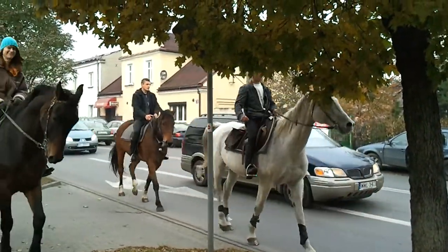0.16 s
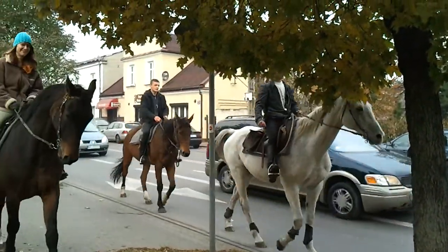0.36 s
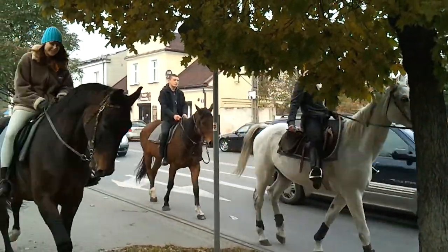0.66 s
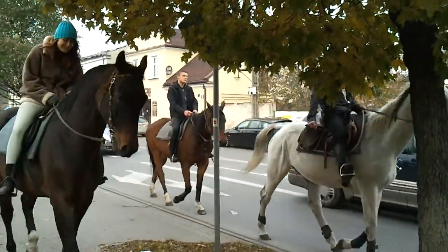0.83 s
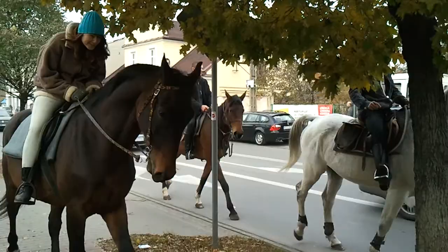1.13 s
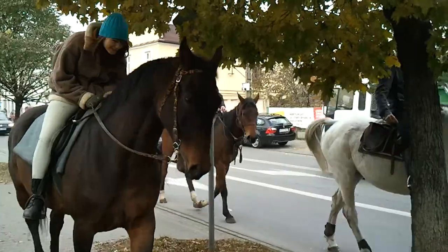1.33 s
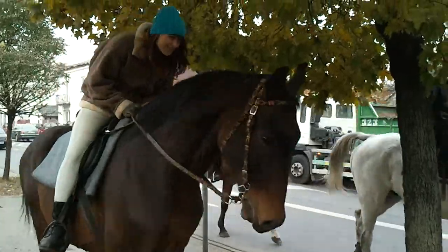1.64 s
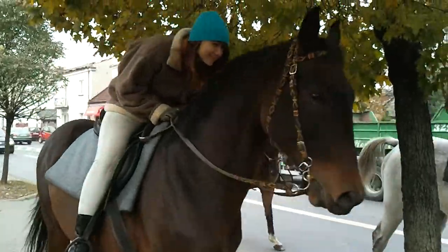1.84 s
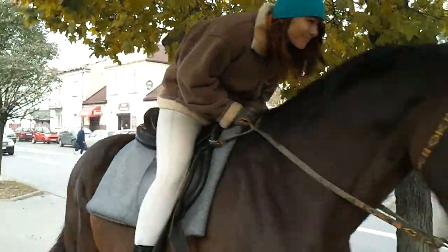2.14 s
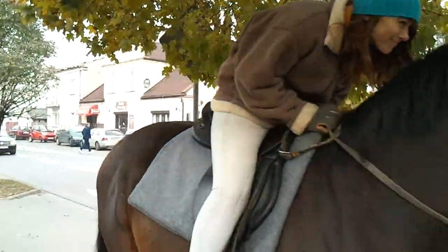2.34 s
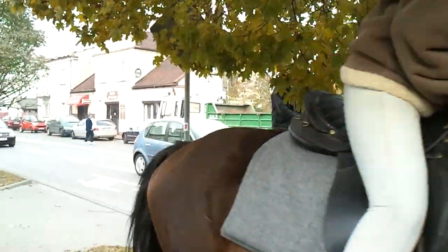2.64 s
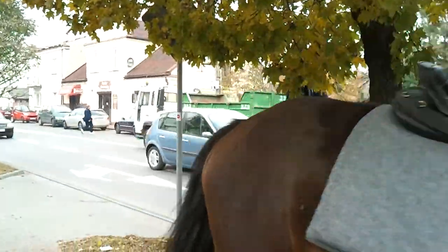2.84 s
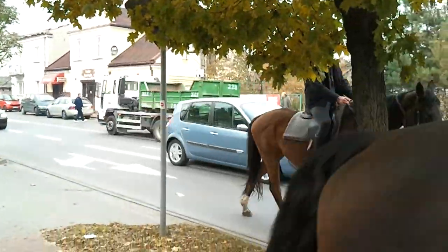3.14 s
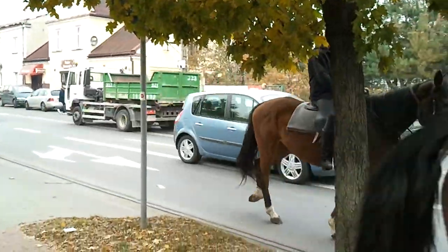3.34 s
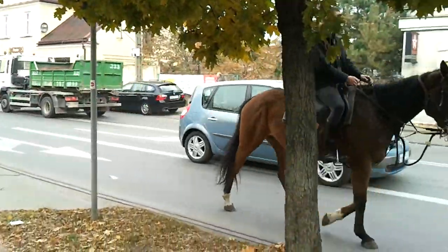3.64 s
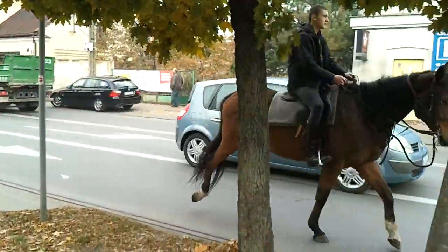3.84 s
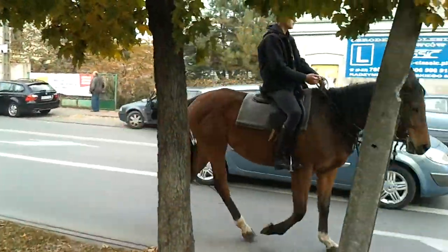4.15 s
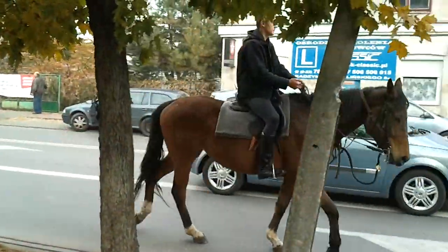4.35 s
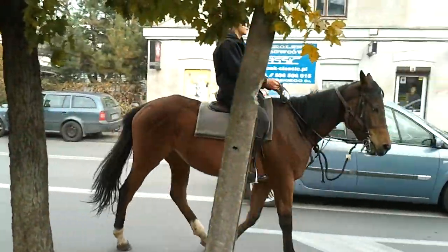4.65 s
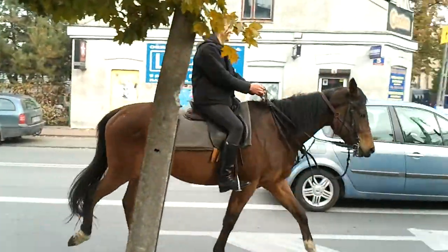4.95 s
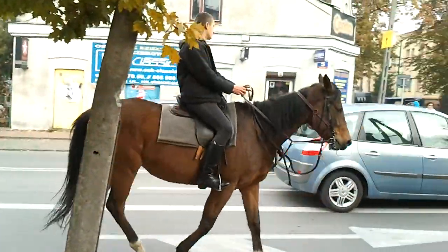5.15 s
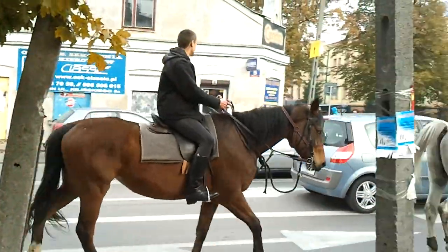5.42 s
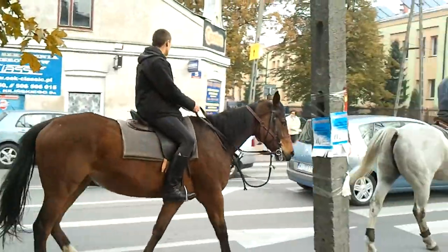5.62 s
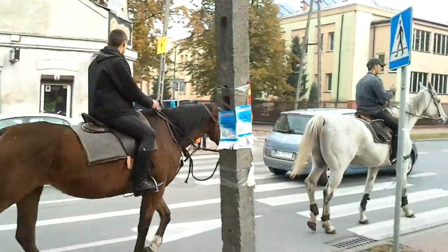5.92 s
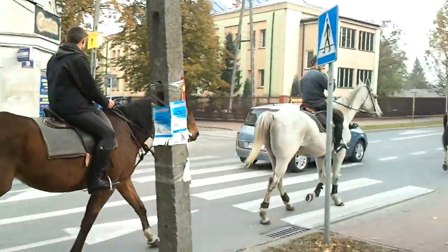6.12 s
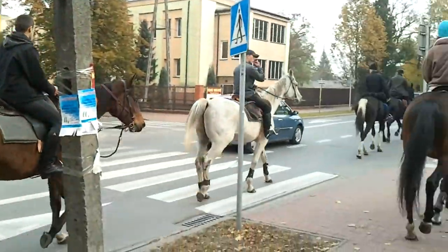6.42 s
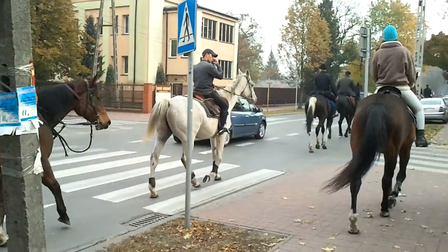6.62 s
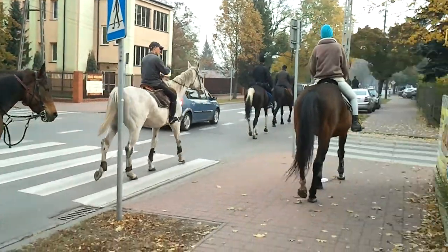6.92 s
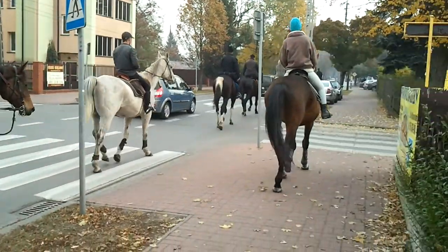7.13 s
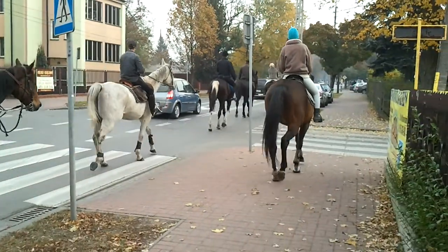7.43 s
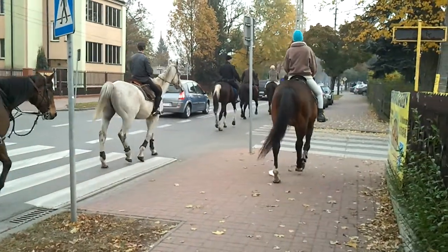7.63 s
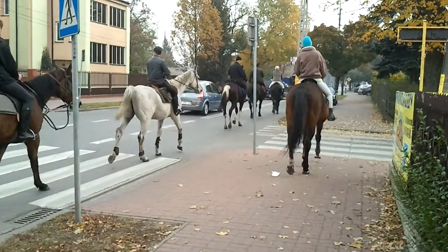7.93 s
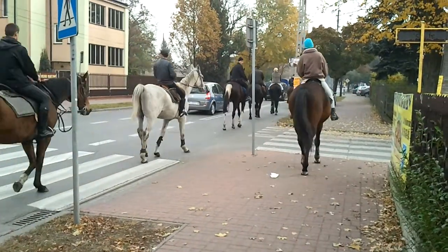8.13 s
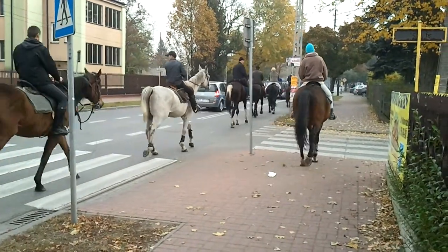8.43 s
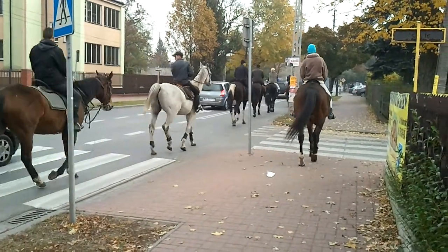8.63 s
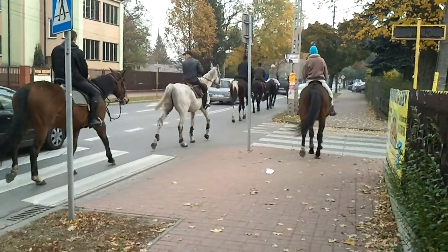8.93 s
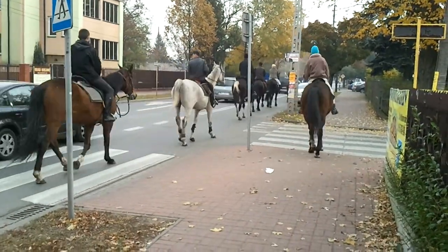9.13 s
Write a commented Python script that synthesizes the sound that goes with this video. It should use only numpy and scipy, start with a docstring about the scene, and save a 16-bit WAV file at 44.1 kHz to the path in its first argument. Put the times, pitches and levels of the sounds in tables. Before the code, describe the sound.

Several horses walk along a paved town street, close to the microphone from the start. Their hooves land in an uneven, overlapping clip-clop, each step a hollow knock with a little grit, sometimes a faint iron clink or scrape, and a slight echo from the house fronts. The clops are densest through the first 4 seconds, with strong single steps up to about 5 seconds. After that they become sparser and softer as the horses move away, continuing to the end at about 9 seconds.

Slow traffic rumbles low throughout. A lorry hums faintly during the first 3 seconds. From around 3 seconds a nearby car pulls away, its low engine note rising gradually. Tyre noise swells gently as vehicles roll by at about 1 second, most clearly near 4.5 seconds, and again around 6 and 7.5 seconds.

```python
"""Horses beside slow traffic.

Several horses walk past and away on a paved street. Each hoof knocks, rings hollow and crunches grit;
iron shoes clink and skid, and house fronts throw the clops back. Engines drone low, one pulling away
with rising pitch; tyre noise swells as each vehicle rolls by. A gain control ducks the loud moments."""
import sys
import numpy as np
from scipy import signal
from scipy.fft import rfft, irfft, next_fast_len
from scipy.io import wavfile
from scipy.ndimage import uniform_filter1d

SR = 44100
rng = np.random.default_rng(int(sys.argv[2]) if len(sys.argv) > 2 else 0)


def to_wav(sig):
    """Store sig (one row per channel, or 1-D mono) as 16-bit WAV at the path in sys.argv[1].

    Samples outside -1..1 are clipped; the rate is SR.
    """
    pcm = np.clip(np.atleast_2d(sig), -1, 1) * 32767
    pcm = np.round(pcm).astype(np.int16)
    wavfile.write(sys.argv[1], SR, pcm.T)  # frames by channels


N = 408807

# Steps of the nearest horses. Each row: start in seconds, knock in relative dB, knock in Hz,
# hollow ring in relative dB, ring in Hz, free ring t60 in seconds, crack in relative dB, crack in Hz.
HOOF_STEPS = [(0.0403, -27, 570.0, -21, 880, 0.021, -44, 1730.0),
              (0.056, -40, 900, -31, 870, 0.025, -40, 1500), (0.068, -36, 800, -31, 780, 0.025, -36, 1500),
              (0.0967, -27, 380.0, -23, 980, 0.045, -36, 1920.0),
              (0.121, -19, 940.0, -21, 720, 0.05, -22.5, 2530.0),
              (0.1322, -39, 550.0, -21.5, 710, 0.027, -30, 1050.0),
              (0.3605, -29, 730.0, -24, 1020, 0.075, -27, 1120.0),
              (0.3916, -14.5, 510.0, -12, 933, 0.038, -30, 1880),
              (0.4034, -21, 920.0, -24, 896, 0.025, -22, 1650.0),
              (0.433, -26, 520.0, -20, 835, 0.017, -45, 1300.0),
              (0.596, -22, 990.0, -31, 553, 0.05, -25.5, 2040.0),
              (0.624, -19, 770.0, -23, 969, 0.058, -38, 1450.0),
              (0.6372, -15.5, 870.0, -32, 1045, 0.05, -20, 1870.0),
              (0.82, -29, 980.0, -30.5, 1090, 0.05, -41, 2220.0),
              (0.898, -38, 1000, -34, 1110, 0.03, -36, 1700),
              (0.9125, -23, 1250.0, -13.5, 876, 0.036, -37, 2200.0),
              (0.9196, -27, 800, -27, 760, 0.018, -39, 2000), (1.097, -34, 900, -26, 1040, 0.03, -38, 1700),
              (1.1549, -18.5, 830.0, -28, 985, 0.034, -32, 2560.0),
              (1.224, -35, 892, -27, 890, 0.03, -40, 1400),
              (1.3335, -22.5, 1290.0, -25.5, 1225, 0.062, -30, 2470.0),
              (1.409, -37, 900, -21.5, 910, 0.025, -34, 1600),
              (1.4336, -27, 1500.0, -15, 760, 0.025, -30, 1950.0),
              (1.483, -36, 380.0, -15.5, 928, 0.04, -36, 1850.0),
              (1.623, -40, 1098, -28, 1090, 0.023, -38, 1500),
              (1.6664, -35, 1100, -22, 1030, 0.025, -39, 2300),
              (1.6733, -15.5, 730.0, -21, 950, 0.05, -24, 1790.0),
              (1.704, -37, 900, -27, 850, 0.03, -37, 1700), (1.73, -32, 1502, -24, 774, 0.018, -42, 2400.0),
              (1.842, -35, 1090.0, -34, 1240, 0.05, -25, 1440),
              (1.888, -33, 805, -32, 1058, 0.045, -33, 1140.0),
              (1.939, -36, 1290, -24, 900, 0.02, -36, 1560),
              (1.9493, -25, 640.0, -16.5, 718, 0.05, -47, 2310.0),
              (2.0067, -24, 1515, -16, 930, 0.056, -31, 1980.0),
              (2.124, -21, 380.0, -28, 1080, 0.058, -24, 1180.0),
              (2.1909, -12.5, 760, -19.5, 690, 0.053, -23, 1560.0),
              (2.2364, -36, 930.0, -22.5, 1040, 0.05, -31, 1960.0),
              (2.247, -22.5, 810.0, -21, 950, 0.027, -34.5, 1870.0),
              (2.281, -40, 850.0, -30, 915, 0.028, -31, 1130.0),
              (2.3108, -29, 510.0, -24.5, 784, 0.05, -31, 1250.0),
              (2.3342, -29, 1210, -32, 950, 0.018, -29, 1480),
              (2.3893, -30, 703, -24, 884, 0.046, -36, 1650.0),
              (2.4607, -11.5, 730.0, -30, 708, 0.05, -36, 1720.0),
              (2.468, -26, 650, -26, 700, 0.02, -38, 1700),
              (2.4927, -28, 610.0, -19.5, 663, 0.048, -32, 1160.0),
              (2.5103, -31, 691, -16, 916, 0.052, -33, 1620.0),
              (2.586, -26, 640.0, -22, 923, 0.01, -38, 2080.0),
              (2.612, -21, 1040.0, -9.5, 430, 0.02, -15.5, 1400.0),
              (2.7012, -29, 800.0, -18.5, 760, 0.075, -19.5, 1660),
              (2.7521, -22.5, 1050.0, -32, 871, 0.049, -36, 1580),
              (2.797, -34, 917, -28, 1020, 0.023, -41, 1700),
              (2.8208, -44, 1500.0, -23, 1400, 0.015, -37, 2490.0),
              (2.8323, -38, 1360.0, -11, 420, 0.014, -22, 1130.0),
              (2.9565, -18.5, 667.4, -27.5, 705, 0.045, -31, 1960),
              (3.023, -38, 1500.0, -19, 930, 0.054, -21.5, 1050.0),
              (3.1, -38, 796, -27.5, 820, 0.03, -38, 1700),
              (3.2107, -19, 860, -27.5, 766, 0.047, -37, 2600),
              (3.279, -35, 800, -26, 864, 0.03, -44, 1700),
              (3.3189, -35, 558, -16.5, 1400, 0.013, -29, 1920),
              (3.416, -36, 900, -25, 1100, 0.03, -42, 1700),
              (3.444, -32, 380.0, -15, 739, 0.025, -30, 1970.0),
              (3.5435, -34, 620.0, -17.5, 950, 0.019, -20, 1140.0),
              (3.599, -19.5, 560.0, -14, 930, 0.02, -37, 2000),
              (3.7065, -38, 900, -17, 855, 0.013, -39, 1880.0),
              (3.8174, -10, 650.0, -15.5, 1025, 0.025, -17, 1600),
              (3.926, -41, 550.0, -17.5, 774, 0.03, -31, 2300.0),
              (4.0684, -24, 950.0, -27, 1056, 0.014, -31, 1900),
              (4.1013, -18, 587, -14, 910, 0.038, -46, 2170.0),
              (4.3314, -18, 690.0, -37, 863, 0.05, -18, 1240.0),
              (4.42, -42, 640.0, -20, 718, 0.011, -29, 2040.0),
              (4.5738, -46, 710.0, -21, 950, 0.033, -44, 1960.0),
              (4.6348, -18, 780, -33, 830, 0.02, -32, 1795),
              (4.716, -40, 810.0, -15.5, 940, 0.013, -45, 1930.0),
              (4.844, -19, 1500.0, -8, 758, 0.012, -17, 1110.0),
              (4.935, -20, 609, -22, 696, 0.066, -40, 2450.0),
              (5.107, -33, 948, -26.5, 990, 0.025, -47, 1700),
              (5.1295, -34, 900, -28, 950, 0.027, -40, 1700),
              (5.1364, -14, 824, -26, 968, 0.04, -44, 2210.0),
              (5.241, -33, 900, -27, 714, 0.025, -40, 1600), (5.313, -36, 1200, -35, 950, 0.021, -26, 1400),
              (5.3835, -25, 960.0, -29, 544.3, 0.058, -28.5, 2000),
              (5.4696, -35, 520.0, -19, 650, 0.069, -44, 1050.0),
              (5.5957, -40, 429.7, -13.5, 903, 0.012, -29, 1890.0),
              (5.771, -31, 730.0, -25, 1033, 0.05, -39, 1690.0),
              (5.886, -34, 700, -25, 694, 0.025, -37, 1593), (6.016, -30, 1210, -32, 950, 0.022, -25, 1330),
              (6.0973, -30, 1500.0, -25.5, 966, 0.05, -40, 2690),
              (6.1738, -23.5, 670, -38, 700, 0.037, -21, 1330),
              (6.419, -36, 700, -28, 666, 0.03, -42, 1600),
              (6.633, -26, 380.0, -22.5, 940, 0.036, -48, 1505),
              (6.7013, -31, 450.0, -17.5, 1060, 0.029, -35, 1800.0),
              (6.708, -24, 600, -33, 910, 0.04, -30, 1810),
              (6.9316, -36, 1270.0, -20, 1049, 0.022, -32, 2670.0),
              (7.1495, -38, 750.0, -27, 1010, 0.037, -34, 2460),
              (7.234, -26, 1200, -34, 950, 0.02, -28, 1510),
              (7.3755, -35, 380.0, -24.5, 721, 0.057, -32, 1350),
              (7.555, -24, 1500.0, -27, 881, 0.012, -29, 1250.0),
              (7.566, -35, 900, -29, 990, 0.032, -40, 1600),
              (7.779, -27, 590.0, -18.5, 769, 0.018, -20, 1140.0),
              (7.8331, -33, 1500.0, -27, 730, 0.05, -35, 2080.0),
              (8.1377, -35, 440.0, -27, 930, 0.043, -39, 2600.0),
              (8.243, -35, 1200, -34, 950, 0.02, -24, 1450), (8.301, -32, 1010, -24, 1020, 0.02, -37, 1503),
              (8.319, -34, 610.0, -19.5, 796, 0.023, -27, 1760.0),
              (8.412, -36, 1200, -33, 950, 0.02, -28, 1430),
              (8.551, -34, 760.0, -26, 979, 0.012, -34, 2230.0),
              (8.604, -35, 910, -26, 1080, 0.015, -34, 1500),
              (8.8023, -37, 1510, -34, 940, 0.05, -26, 1040), (8.818, -39, 800, -30, 840, 0.03, -44, 1600),
              (8.8828, -36, 380.0, -31, 784, 0.04, -33.5, 2260.0),
              (8.91, -38, 800, -29.5, 875, 0.025, -40, 1600), (9.136, -40, 1200, -41, 953, 0.02, -30, 1480),
              (9.2191, -33, 800, -29, 895, 0.039, -46, 1510.0)]
# Low road roar. Each row: frequency in Hz, density in relative dB.
ROAR_SPECTRUM = [(200, -10), (300, 2), (420, 2), (530, -1), (680, -5.5), (950, -21), (1400, -37.5)]


def from_db(db):
    """Decibels to gain."""
    return 10 ** (np.asarray(db) / 20)


def unit_rms(x):
    """Scale to unit power."""
    return x / np.sqrt(np.mean(x ** 2) + 1e-20)


def curves(rows):
    """Interpolate each column per sample; the first column is time in seconds."""
    times_s, *columns = np.transpose(rows)
    return [np.interp(np.arange(N) / SR, times_s, column) for column in columns]


def add(track, start_s, sound):
    """Mix a short sound into a track."""
    start = int(np.clip(round(start_s * SR), 0, N - 1))
    track[start:start + len(sound)] += sound[:N - start]


def drift(rate_hz):
    """Slow random curve, unit RMS."""
    knots = rng.standard_normal(4096)
    return unit_rms(np.interp(np.arange(N) / SR * rate_hz, np.arange(len(knots)), knots))


def coloured(noise, spectrum):
    """Shape noise to (Hz, dB) points, rolling off outside them; unit RMS."""
    size = next_fast_len(len(noise))
    hz, db = np.transpose(spectrum)
    log_hz = np.log(np.maximum(np.arange(size // 2 + 1) * SR / size, 1))
    beyond = np.maximum(log_hz - np.log(hz[-1]), 0) + np.maximum(np.log(hz[0]) - log_hz, 0)
    gain = from_db(np.interp(log_hz, np.log(hz), db)) * np.exp(-2 * beyond)
    return unit_rms(irfft(rfft(noise, size) * gain, size)[:len(noise)])


def wash(db, spectrum, waver_db):
    """Coloured noise with a wavering level."""
    return from_db(db + waver_db * drift(12)) * coloured(rng.standard_normal(N), spectrum)


def grains(count, spread_db):
    """Spiky white noise: each sample gets a random boost."""
    return rng.standard_normal(count) * from_db(spread_db * np.minimum(rng.exponential(1, count), 4))


def nearness(nearest_s, half_s):
    """Power of a source passing in a straight line: 1 at nearest_s, halved half_s away."""
    return 1 / (1 + ((np.arange(N) / SR - nearest_s) / half_s) ** 2)


def mode(t, hz, t60_s, rise_s=0.00035, glide_per_s=0):
    """Struck resonance that builds up during contact; its pitch may glide."""
    phase = 2 * np.pi * hz * t * (1 + .5 * glide_per_s * t)
    return np.sin(phase) * from_db(-60 * t / t60_s) * (1 - np.exp(-t / rise_s))


def softened(x, cutoff_hz):
    """Low-pass that dulls the treble of the clops and scrapes."""
    return signal.sosfilt(signal.butter(6, cutoff_hz, fs=SR, output="sos"), x + 1e-18)


def traffic_bed():
    """Blended noise of many vehicles: rumble, drone, roar and hiss. The rumble swells once."""
    # Each row: frequency in Hz, density in relative dB.
    rumble_spectrum = [(20, -7), (35, 4), (60, 2), (90, -1.5), (130, -2.5), (170, -5.5), (230, -25),
                       (400, -43)]
    drone_spectrum = [(120, -21.5), (165, -9), (205, 0), (250, -4), (320, -11.5), (450, -36.5)]
    swell_spectrum = [(65, -15.5), (90, -1), (130, -7), (160, -4.5), (200, -9)]
    hiss_spectrum = [(2500, -16), (3500, -2), (4400, 2), (5500, 0), (7000, -0.5), (8000, -5)]
    # Drone of the heavier engines. Each row: time in seconds, level in dB.
    drone_levels = [(0, -36.5), (.8, -32), (1.3, -34), (2.1, -33), (3.1, -40), (3.85, -36.5), (4.7, -39.5),
                    (6.7, -37.5), (8.4, -39), (9.1, -36)]
    drone_db, = curves(drone_levels)
    rumble = wash(-30, rumble_spectrum, waver_db=1.0)
    drone = wash(drone_db, drone_spectrum, waver_db=0.54)
    swell = nearness(7.22, half_s=0.069) * wash(-29, swell_spectrum, waver_db=0.5)
    roar = wash(-41.5, ROAR_SPECTRUM, waver_db=2.64)
    hiss = wash(-67.5, hiss_spectrum, waver_db=0.9)
    return rumble + drone + swell + roar + hiss


def engine(hz, db, orders=((1, 0),), waver=0.00297, flutter_db=1.0):
    """Exhaust pulses as harmonics of the firing rate; the overtones flutter."""
    phase = 2 * np.pi * np.cumsum(hz * (1 + waver * drift(9))) / SR
    out = np.zeros(N)
    for multiple, order_db in orders:
        wobble_db = flutter_db * drift(5.4) * (multiple > 1)
        out += from_db(order_db + wobble_db) * np.sin(multiple * phase + rng.uniform(0, 2 * np.pi))
    return from_db(db) * out


def creeping_cars():
    """Two engines creep along behind, slowly gaining pitch."""
    # Each row: time in seconds, firing rate in Hz, level in relative dB.
    slow_car = [(3.3, 35.5, -63.5), (4, 35.75, -39.5), (5.6, 37.26, -34), (5.9, 36.65, -31.5),
                (8.2, 39.97, -26), (9.27, 42.67, -32.5)]
    far_car = [(2.7, 38.6, -58), (3.1, 37.72, -28), (3.9, 42.78, -27), (4.6, 45.16, -25.5),
               (5.3, 46.97, -31.5), (6.8, 47.69, -29.5), (7.7, 49.5, -29), (8.2, 49.3, -44)]
    # Exhaust harmonics. Each row: multiple of the firing rate, gain in dB.
    slow_orders = [(1, 5.5), (2, -19), (3, -20), (4, -21), (5, -16), (9, -20.5)]
    far_orders = [(1, 1), (2, -9), (3, -13.5)]
    return engine(*curves(slow_car), slow_orders) + engine(*curves(far_car), far_orders)


def engine_hums():
    """Single tones: a lorry hums early on, another engine rises later."""
    # Each row: time in seconds, pitch in Hz, level in dB.
    rising_hum = [(6, 178, -70), (6.35, 182, -36), (6.8, 189, -32), (7.1, 190, -38), (7.35, 192, -38),
                  (7.7, 201, -34.5), (8.1, 204, -49), (8.5, 205, -59)]
    lorry_hum = [(0, 204.9, -48), (.5, 199.1, -32.5), (1, 196, -33), (1.3, 194.4, -53),
                 (2.15, 196.6, -35.5), (2.6, 201, -49.5), (3, 199, -55)]
    return engine(*curves(rising_hum)) + engine(*curves(lorry_hum))


def nearest_car():
    """Coasts, then pulls away: the fundamental booms, the overtones growl under load."""
    # Each row: time in seconds, firing rate in Hz.
    firing_rates = [(0, 48.56), (1.5, 45.62), (2.2, 39.31), (2.8, 40.92), (3.8, 48.5), (5.3, 61.04),
                    (6.5, 73.77), (9.27, 100)]
    # Each row: time in seconds, level in relative dB.
    boom_levels = [(0, -26.5), (0.38, -25.5), (0.97, -31), (1.1, -19.5), (1.48, -17), (1.63, -30.5),
                   (2.55, -31), (3.1, -16.5), (3.7, -22.5), (4.6, -20.5), (5.52, -23.5), (5.62, -37),
                   (6.1, -27.5), (6.4, -33), (6.52, -22), (6.9, -28), (7.2, -26), (7.45, -35.5),
                   (7.7, -24.5), (8.05, -32), (8.4, -26.5), (8.7, -24.5), (8.88, -39), (9.05, -28)]
    growl_levels = [(0, -43), (2.8, -46.5), (3.3, -39), (3.8, -32), (5.1, -37), (5.7, -42), (7.2, -41.5),
                    (9.27, -54.5)]
    # Each row: multiple of the firing rate, gain in dB.
    growl_orders = [(2, 1), (3, -4.5), (4, -5), (5, -6.5), (6, -10), (7, -15), (8, -12)]
    firing_hz, = curves(firing_rates)
    boom = engine(firing_hz, *curves(boom_levels), orders=[(1, 2.75)])
    growl = engine(firing_hz, *curves(growl_levels), orders=growl_orders)
    return boom + growl


def passing_tyres():
    """Road noise follows each vehicle's distance; the sizzle carries only from close by."""
    # Each row: nearest time in seconds, half-power time in seconds, then peak levels in dB of
    # low roar, tyre noise, tread roar and tread sizzle.
    passes = [(1.0, 0.36, -45.5, -43.5, -51, -74), (2.35, 0.84, -46, -47, -62.5, -79.5),
              (3.7, 0.28, -48.5, -48, -45, -76.5), (4.35, 0.36, -39, -39, -43, -66),
              (5.749, 0.21, -49, -45, -48.5, -66.5), (6.149, 0.5, -42.5, -43.5, -41.5, -68.5),
              (7.699, 0.93, -46, -43.5, -47, -71), (9.1, 0.11, -43, -49.5, -48, -74)]
    # Each row: frequency in Hz, density in relative dB.
    tyre_spectrum = [(500, -21), (750, 2.5), (1100, 3), (1350, -6), (1700, -8), (2150, -12.5), (2600, -9),
                     (3000, -19), (3600, -30.5), (5000, -53.5)]
    tread_spectrum = [(700, -18.5), (1050, -7), (1300, 2), (1750, 0), (2100, -9.5), (2600, -11.5),
                      (3100, -38.5)]
    sizzle_spectrum = [(3000, -4.5), (4200, -2), (5100, 0.5), (6000, -3.5), (8000, -24)]
    low_power = tyre_power = tread_power = sizzle_power = 0
    for nearest_s, half_s, low_db, tyre_db, tread_db, sizzle_db in passes:
        near = nearness(nearest_s, half_s)
        low_power += near * from_db(low_db) ** 2
        tyre_power += near * from_db(tyre_db) ** 2
        tread_power += near * from_db(tread_db) ** 2
        sizzle_power += (near * from_db(sizzle_db)) ** 2
    return (wash(10 * np.log10(low_power), ROAR_SPECTRUM, waver_db=1.46)
            + wash(10 * np.log10(tyre_power), tyre_spectrum, waver_db=0.5)
            + wash(10 * np.log10(tread_power), tread_spectrum, waver_db=-1.0)
            + wash(10 * np.log10(sizzle_power), sizzle_spectrum, waver_db=0.4))


def street_echoes(x, early_db=-13, early_t60_s=0.084, late_db=-18.5, late_t60_s=0.42, blocks=48):
    """Add scatter from ground, horses and cars, then a thin tail between the house fronts."""
    # Each row: frequency in Hz, density in relative dB.
    echo_spectrum = [(200, -9), (500, -4.5), (1000, 5.5), (2000, -0.5), (4000, 4.5), (8000, 5)]
    t, out = np.arange(SR // 3) / SR, x.copy()
    early = unit_rms(from_db(-60 * t / early_t60_s) * (t > .003))
    late = unit_rms(from_db(-60 * t / late_t60_s) * (t > .02))
    decay = np.hypot(from_db(early_db) * early, from_db(late_db) * late) / np.sqrt(len(t))
    # New paths per block, as the horses move.
    paths = coloured(rng.standard_normal(blocks * len(t)), echo_spectrum).reshape(blocks, -1)
    for block, echoes in zip(np.array_split(np.arange(N), blocks), paths):
        add(out, block[0] / SR, signal.fftconvolve(x[block], decay * echoes))
    return out


def far_hooves(horses=3, step_s=0.272, jitter_s=.03, recede_db_per_s=0.2, spread_db=7.5, fade_s=0.02):
    """The other horses walk away, each at its own pace; distance smears the steps into scuffs."""
    # Each row: frequency in Hz, density in relative dB.
    scuff_spectrum = [(450, -13), (750, -1), (1050, 3.5), (1400, 0), (2500, -23.5)]
    t, envelope = np.arange(SR // 10) / SR, np.zeros(N)
    for offset, pace in rng.uniform(-1, 1, (horses, 2)):
        for step, (late, loud) in enumerate(rng.uniform(-0.9, 1, (40, 2))):
            start_s = step_s * (step + offset) * (1 + .08 * pace) + jitter_s * late
            if 0 < start_s < N / SR:
                db = -44 - recede_db_per_s * start_s + spread_db * loud
                add(envelope, start_s, from_db(db) * np.exp(-t / fade_s))
    return envelope * coloured(rng.standard_normal(N), scuff_spectrum)


def asphalt_crunch(gain_db=-22, fade_s=0.0088, lead_s=0.0017):
    """Each near step grinds on rough asphalt in proportion to its force."""
    # Each row: frequency in Hz, density in relative dB.
    crunch_spectrum = [(500, -13.5), (1000, 7), (1800, 0), (2600, -7.5), (3300, -21.5), (6000, -36.5)]
    t, pressure = np.arange(SR // 10) / SR, np.zeros(N)
    pulse = np.exp(-t / fade_s) * (1 - np.exp(-t / lead_s))
    for start_s, knock_db, _, ring_db, _, _, crack_db, _ in HOOF_STEPS:
        force = from_db(knock_db) + .5 * from_db(ring_db) + from_db(crack_db)
        add(pressure, start_s - lead_s, force * pulse)
    return from_db(gain_db) * pressure * coloured(grains(N, spread_db=3), crunch_spectrum)


def grit(gain_db=10, rise_s=0.000065, slide_db=-17, slide_s=0.055):
    """Sand cracks as a hoof lands, then rasps softly as it slides to rest."""
    # Each row: start in seconds, level in relative dB, fade time in seconds.
    scuffs = [(0.12, -47, .006), (0.376, -47.5, 0.005), (0.392, -49, 0.0037), (0.634, -48, 0.0054),
              (0.914, -48.5, 0.0069), (1.159, -53, 0.0073), (1.433, -53, 0.0091), (1.452, -51, 0.0061),
              (1.675, -49, 0.0039), (2.008, -48, 0.0033), (2.191, -48.5, .003), (2.461, -55, .006),
              (2.492, -50, 0.0036), (2.703, -60, 0.0037), (2.957, -53.5, .003), (3.023, -53.5, .007),
              (3.209, -54, 0.004), (3.545, -58, 0.0025), (3.707, -52, .003), (3.819, -61, 0.0024),
              (4.575, -53, .006), (5.631, -49, 0.0039), (6.708, -46.5, 0.0027), (6.986, -54, .01),
              (7.372, -51, 0.011), (7.764, -50.5, 0.014), (8.137, -50, 0.0034), (8.308, -56, .009),
              (8.518, -55, 0.0046), (8.803, -53, .005), (9.05, -51, 0.0023), (9.228, -51, .003)]
    # Each row: frequency in Hz, density in relative dB.
    grit_spectrum = [(500, -4.5), (1100, 19.5), (1800, 13), (2600, 13.5), (3500, -2.5), (4500, -0.5),
                     (6300, -3.5), (8000, -9.5)]
    t, pressure = np.arange(SR // 6) / SR, np.zeros(N)
    attack = 1 - np.exp(-t / rise_s)
    slide = from_db(slide_db) * np.exp(-t / slide_s)
    for start_s, db, fade_s in scuffs:
        add(pressure, start_s, from_db(db) * (np.exp(-t / fade_s) + slide) * attack)
    return from_db(gain_db) * pressure * coloured(grains(N, spread_db=1), grit_spectrum)


def iron_clinks(chatter_s=0.02, chatter_db=-11):
    """Shoes and bits ring in two close modes and a faint upper one, chattering as they skid."""
    # Each row: start in seconds, pitch in Hz, level in relative dB, t60 in seconds.
    clinks = [(0.327, 1420, -27, .012), (0.393, 4450, -42, .014), (0.394, 6600, -41.5, .022),
              (0.598, 2040, -43, .014), (0.641, 1650, -25.5, .012), (1.453, 2420, -28.5, .015),
              (1.454, 5260, -41, .014), (1.484, 4670, -44, .014), (2.336, 2160, -36, .014),
              (2.494, 5360, -43.5, .018), (2.494, 6440, -45, .016), (2.957, 4200, -49.5, .04),
              (3.211, 6200, -53, .03), (3.445, 4200, -52, .03), (3.545, 6460, -51.5, .035),
              (3.927, 5560, -51, .035), (5.023, 2400, -30.5, .012), (8.385, 2050, -31, .014)]
    t, out = np.arange(SR // 20) / SR, np.zeros(N)
    for start_s, hz, db, t60_s in clinks:
        ring = sum(from_db(mode_db) * mode(t, hz * ratio, t60_s)
                   for ratio, mode_db in [(1, 0), (1.07, -7), (3.5, -24)])
        add(out, start_s, from_db(db) * ring)
        for lag in rng.random(4):
            add(out, start_s + chatter_s * lag, from_db(db + chatter_db) * np.exp(-lag) * ring)
    return out


def shoe_scrapes(t60_s=0.0079, pair_ratio=0.92, pair_db=-4, hoof_hz=1350):
    """A shoe skids on stone: tiny catches ring two close iron modes and the hoof behind them."""
    # Each row: start in seconds, ring in Hz, peak before the low-pass in dB, fade time in seconds.
    skids = [(0.118, 2700, -33, 0.0083), (0.393, 2750, -38, .008), (0.637, 3870, -41, .008),
             (0.915, 2600, -39, .01), (1.673, 3500, -40, .008), (1.448, 2450, -31, 0.011),
             (2.492, 2930, -39, .003), (6.597, 3040, -38, 0.0099), (6.707, 2850, -29.5, 0.0027),
             (6.931, 2935, -40, .005), (6.983, 2830, -37, 0.0078), (7.372, 3040, -36, 0.0068),
             (7.763, 3320, -38.5, 0.0042), (7.779, 2820, -41, 0.006), (8.136, 3220, -40, 0.0067),
             (8.307, 2850, -42, 0.016), (8.513, 2900, -35.5, 0.007), (8.802, 2906, -44, 0.0085)]
    t, out = np.arange(SR // 12) / SR, np.zeros(N)
    for start_s, hz, db, fade_s in skids:
        catches = unit_rms(grains(len(t), spread_db=4)) * np.exp(-t / fade_s)
        iron = mode(t, hz, t60_s) + from_db(pair_db) * mode(t, hz * pair_ratio, t60_s)
        hoof = mode(t, hoof_hz, t60_s / 2)
        ring = signal.fftconvolve(catches, iron + hoof)[:len(t)]
        add(out, start_s, from_db(db) * ring / np.abs(ring).max())
    return softened(out, cutoff_hz=3900)


def knock(t, hz, width_cycles=0.42):
    """Dead blow on paving: a rounded push and rebound around t = 0."""
    cycles = t * hz
    return np.sin(2 * np.pi * cycles) * np.exp(-.5 * (cycles / width_cycles) ** 2)


def settling(t, hold_s=0.0051, choke_db=-7, fade_s=.02, rock_db=3.5, rock_s=0.0014):
    """Envelope of a clop: uneven as the hoof rocks, choked by the full weight."""
    seated = 1 - 1 / (1 + (t / hold_s) ** 6)
    rocking = np.interp(t, rock_s * np.arange(32), rng.standard_normal(32))
    rocking *= np.clip(t / hold_s, 0, 1)
    return from_db(choke_db * seated + rock_db * rocking) * np.exp(-.5 * (t / fade_s) ** 2)


def clop(knock_db, knock_hz, ring_db, ring_hz, ring_t60_s, crack_db, crack_hz,
         contact_s=0.001476, crack_t60_s=0.012, spread_db=4, detune=0.025):
    """One landing: dead knock, hollow ring, sharp crack and faint side modes."""
    # Hoof capsule. Each row: multiple of the ring pitch, dB relative to the ring, t60 in seconds.
    capsule_modes = [(0.621, -17, 0.013), (1.26, -26, 0.026)]
    # Shoe on stone. Each row: frequency in Hz, dB relative to the force, t60 in seconds.
    shoe_modes = [(1410, -33, 0.0072), (1760, -27.5, 0.023), (2570, -23.5, 0.021)]
    t = np.arange(SR // 16) / SR - contact_s
    force = np.hypot(from_db(knock_db), .5 * from_db(ring_db))
    side_modes = [(ratio * ring_hz, from_db(ring_db + db), t60_s) for ratio, db, t60_s in capsule_modes]
    side_modes += [(hz, force * from_db(db), t60_s) for hz, db, t60_s in shoe_modes]
    modes = [(ring_hz, from_db(ring_db), ring_t60_s), (crack_hz, from_db(crack_db), crack_t60_s)]
    for hz, gain, t60_s in side_modes:
        loud, sharp = rng.standard_normal(2)
        modes.append((hz * np.exp(detune * sharp), gain * from_db(spread_db * loud), t60_s))
    glide_per_s = 5 * np.tanh(rng.standard_normal())   # the hollow under the sole changes under load
    out = from_db(knock_db) * knock(t, knock_hz)
    for hz, gain, t60_s in modes:
        since_push_s = np.maximum(t + .5 / hz, 0)
        out -= gain * mode(since_push_s, hz, t60_s, rise_s=0.00056, glide_per_s=glide_per_s)
    return out * settling(t)


def near_hooves(rim_db=-23, rim_spread_db=4, rim_lead_s=0.0074, rim_ratio=1.3):
    """Nearest horses: the rim of each hoof touches lightly just before it lands flat."""
    t, out = np.arange(SR // 20) / SR, np.zeros(N)
    for start_s, *step in HOOF_STEPS:
        knock_db, _, ring_db, ring_hz = step[:4]
        loud, early = np.clip(rng.standard_normal(2), -1, 1)
        touch_db = max(knock_db, ring_db) + rim_db + rim_spread_db * loud
        touch = from_db(touch_db) * mode(t, rim_ratio * ring_hz, t60_s=0.03)
        add(out, start_s - rim_lead_s * np.exp(.3 * early), touch)
        add(out, start_s, clop(*step))
    return softened(out, cutoff_hz=2900)


def gain_control(x, threshold_db=-24, share=0.36, window_s=0.025, release_db_per_s=30):
    """Cut the gain by a share of the level above threshold, then recover."""
    power = uniform_filter1d(x[0] ** 2, int(window_s * SR))
    over_db = np.maximum(10 * np.log10(np.maximum(power, 1e-12)) - threshold_db, 0)
    recovery_db = release_db_per_s * np.arange(N) / SR
    held_db = np.maximum.accumulate(over_db + recovery_db) - recovery_db
    return x * from_db(-share * uniform_filter1d(held_db, SR // 50))


def scene():
    """Echoing horses plus traffic, mono."""
    horses = near_hooves() + far_hooves() + asphalt_crunch() + grit() + iron_clinks() + shoe_scrapes()
    traffic = nearest_car() + creeping_cars() + engine_hums() + traffic_bed() + passing_tyres()
    return (street_echoes(horses) + traffic)[None, :]


def record(dry):
    """Small microphone: gain control, then a steep low-pass at 8100 Hz."""
    lowpass = signal.ellip(10, .1, 80, 8100, fs=SR, output="sos")
    return signal.sosfilt(lowpass, gain_control(dry))


dry = scene()
out = record(dry)
to_wav(out)
```